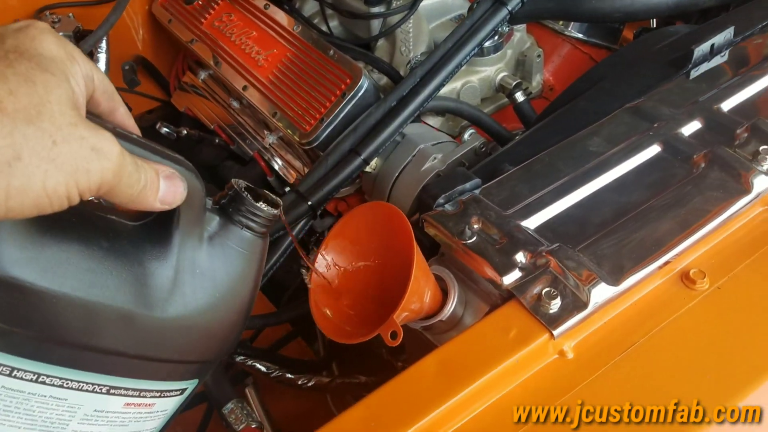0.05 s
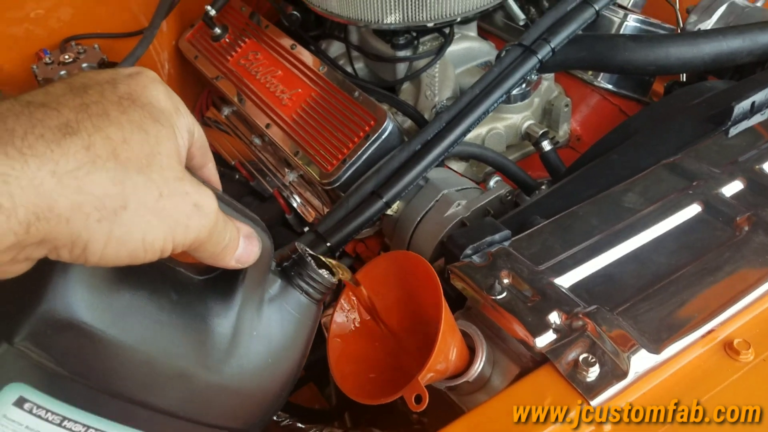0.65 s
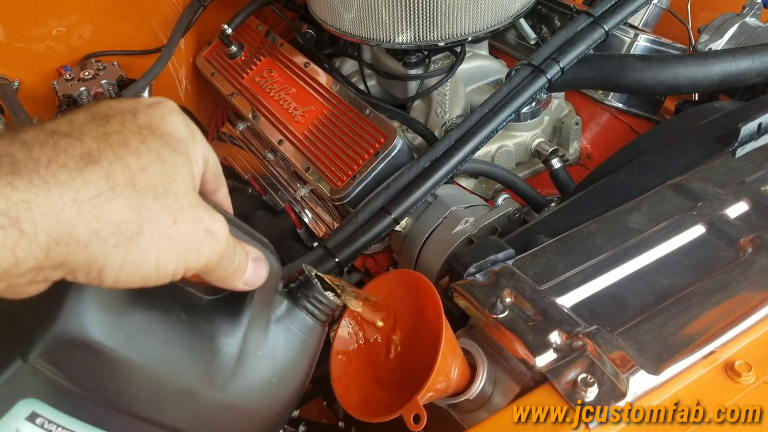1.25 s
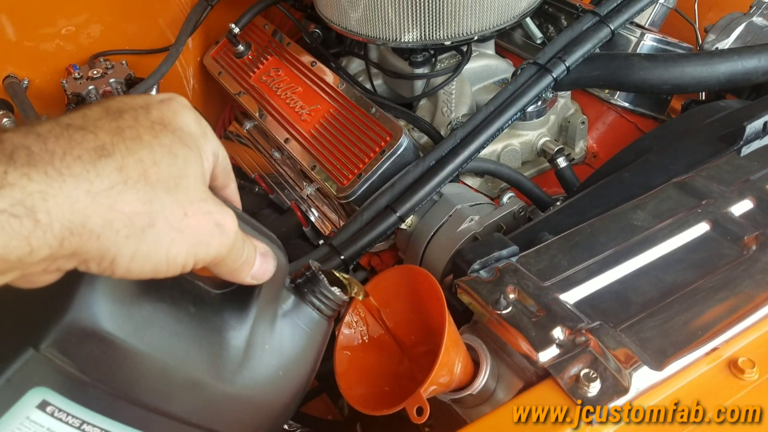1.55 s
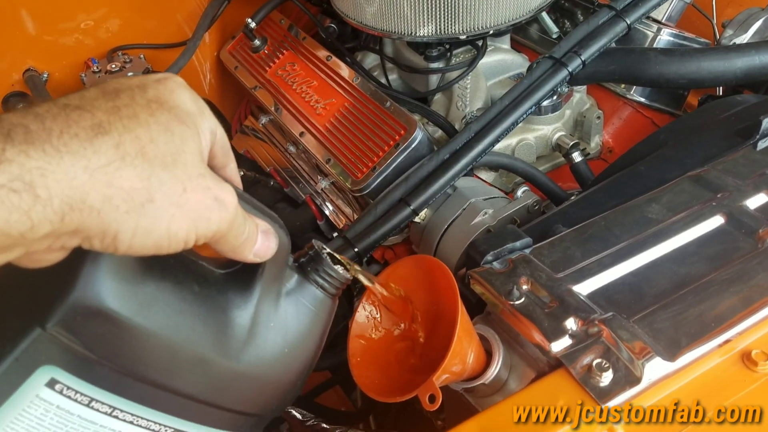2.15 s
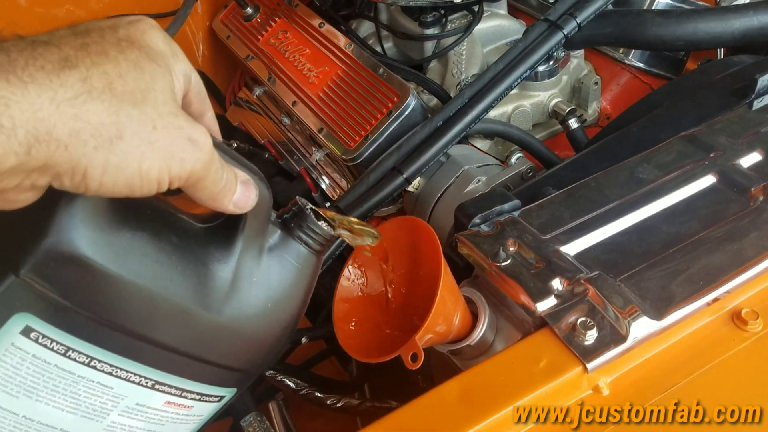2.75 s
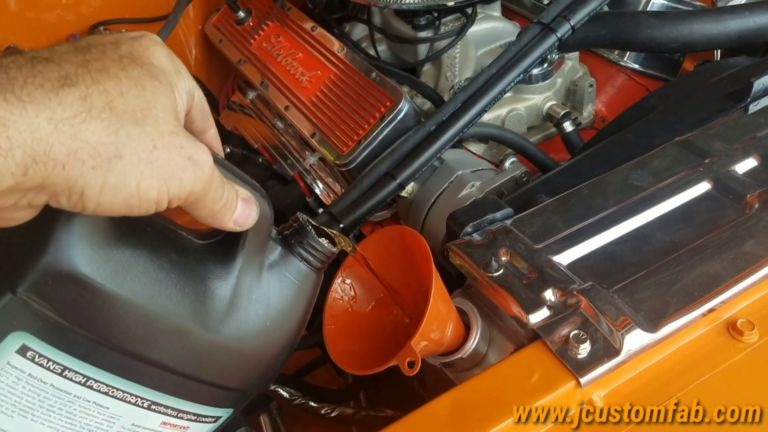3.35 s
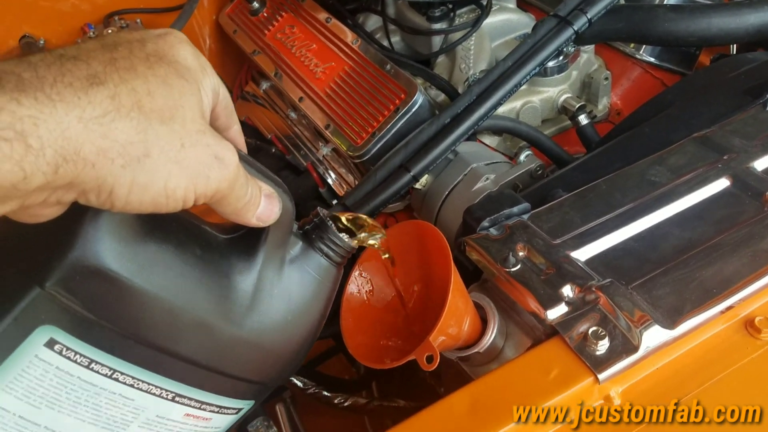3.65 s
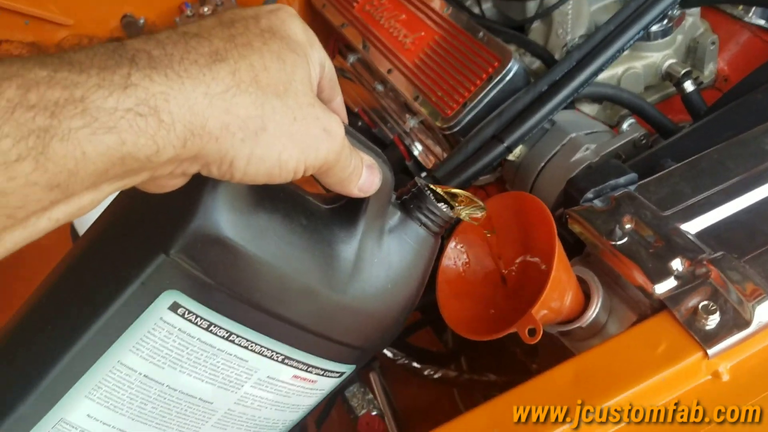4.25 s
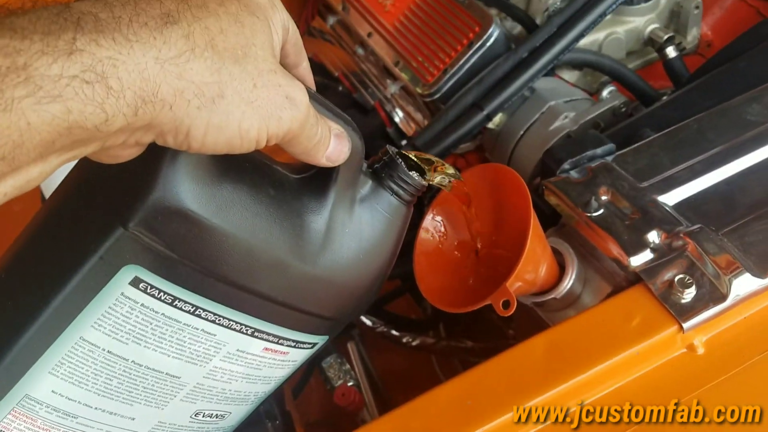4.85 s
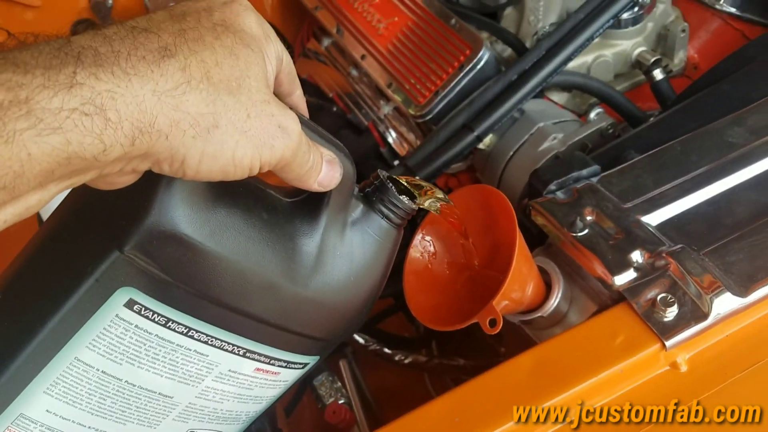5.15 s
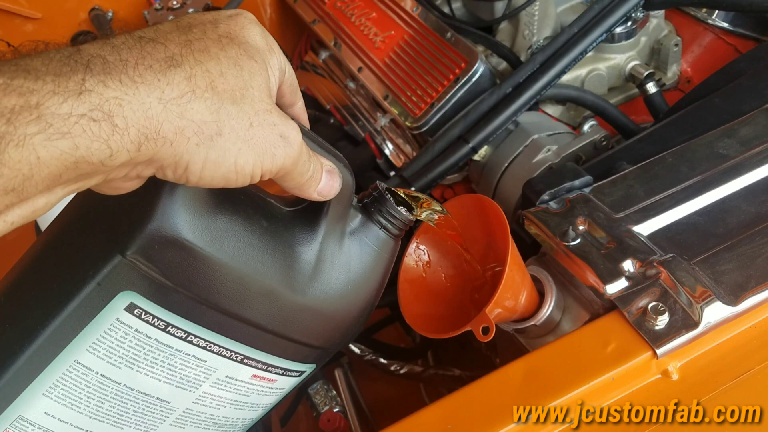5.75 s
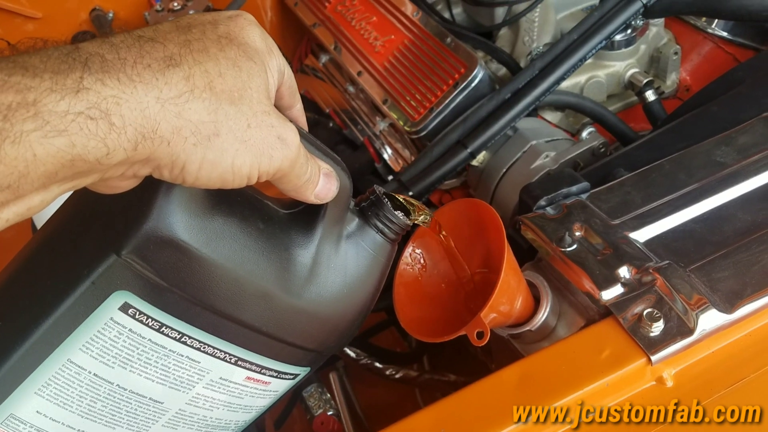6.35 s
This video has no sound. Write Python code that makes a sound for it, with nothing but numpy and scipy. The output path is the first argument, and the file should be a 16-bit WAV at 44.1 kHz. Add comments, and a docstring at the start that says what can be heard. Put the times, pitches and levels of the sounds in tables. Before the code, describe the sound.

Liquid pours from a plastic jug into a funnel, glugging and splashing softly, with a few knocks and rubs on the microphone.

```python
"""Coolant runs from a plastic jug into a funnel in a car's engine bay, inside a quiet garage.
The stream traps ringing bubbles and splashes on the funnel wall; two early knocks hit the camera case.
The jug glugs at a steady beat, air gulps up the filler neck and the liquid burbles into the radiator.
Past midway the hand-held camera is shifted: fingers knock and rub on it, close to the right microphone.
Toward the end the pour settles to an even stream."""
import sys
import numpy as np
from scipy import signal
from scipy.fft import rfft, irfft
from scipy.io import wavfile
from scipy.ndimage import uniform_filter1d, map_coordinates

SR = 44100
rng = np.random.default_rng(int(sys.argv[2]) if len(sys.argv) > 2 else 0)


def unload_wav(signal):
    """Save mono or channel-first audio to the path in sys.argv[1] as 16-bit WAV at rate SR, clipped to [-1, 1]."""
    wavfile.write(
        sys.argv[1],
        SR,
        np.round(np.clip(np.atleast_2d(signal).T, -1, 1) * 32767).astype(np.int16),
    )


N = 282151
TIME = np.arange(N) / SR
TOP_HZ = 15500
RING_HZ = 2310  # a typical bubble
IMPACT_FALL_S = 0.00068  # 1/e decay of a drop's first contact
# spectrum of spraying liquid: f/Hz, level/dB
SPRAY = [(220, -26), (600, -6.5), (1400, -1.5), (3000, -3), (6500, -7), (9000, -15.5), (12000, -8),
         (16000, -17)]


def plinks():
    """Minnaert resonance: a drop smacks the pool and traps a large bubble, ringing among smaller ones."""
    # large bubbles in the funnel: t/s, f/Hz, level/dB
    bubbles = [(0.3815, 2510, -35.5), (0.434, 1336, -30.5), (0.536, 1960, -33.5), (0.6576, 2000, -30),
               (0.6709, 1240, -31), (0.682, 5860, -30.5), (0.696, 1910, -29), (0.716, 1850, -36),
               (0.789, 2610, -28.5), (0.8136, 1670, -35), (0.8388, 1740, -33), (0.93, 1930, -26),
               (1.107, 1240, -35.5), (1.12, 3010, -30.5), (1.136, 1630, -37), (1.322, 1930, -29.5),
               (1.3392, 1610, -26.5), (1.3853, 1265, -34), (1.427, 1270, -38), (1.6146, 2510, -25),
               (1.7633, 1920, -26), (1.8045, 1445, -29.5), (1.816, 1910, -38), (1.977, 2540, -34.5),
               (2.14, 1370, -27), (2.198, 2050, -30), (2.2044, 2520, -29), (2.244, 2430, -32.5),
               (2.5264, 2180, -34), (2.6935, 2160, -31.5), (2.891, 7060, -39), (3.0324, 1600, -36.5),
               (3.088, 2720, -24), (3.1741, 2490, -27), (3.38, 5250, -31.5), (3.44, 2900, -27),
               (3.452, 5050, -37.5), (3.637, 1740, -28), (3.6804, 2235, -26.5), (3.763, 2600, -30.5),
               (3.824, 2170, -30), (4.004, 2260, -24.5), (4.1893, 1760, -30.5), (4.241, 1660, -30.5),
               (4.4154, 1250, -35), (4.437, 1710, -28.5), (4.472, 1640, -29.5), (4.6247, 1670, -22),
               (4.866, 1530, -39), (4.9158, 2270, -33.5), (4.963, 4600, -44.5), (4.9799, 1900, -33),
               (5.0273, 1250, -36.5), (5.118, 3180, -41), (5.154, 4600, -49), (5.202, 2160, -41),
               (5.293, 1660, -33.5), (5.4324, 2500, -42), (5.5647, 2075, -25), (5.593, 3550, -36),
               (5.627, 3200, -38), (5.7391, 1310, -32.5), (5.852, 5120, -30.5), (5.951, 1820, -30.5),
               (6.0256, 2500, -37.5), (6.0884, 2360, -38), (6.223, 1930, -34.5), (6.2547, 1150, -35.5),
               (6.265, 4440, -36), (6.2965, 3320, -32.5)]
    large, churn, pieces, impacts = np.zeros((2, N)), np.zeros(N), np.zeros(N), np.zeros(N)
    lead_s, clutch_s, clutch_octaves = 0.003, 0.05, 0.97  # the small bubbles' head start and spread
    t = TIME[:SR // 4]
    wake = (1 - np.exp(-t / 0.0018)) * np.exp(-t / 0.009)  # the pool churns for a moment
    for (s, hz, db), bend in zip(bubbles, rng.standard_normal(len(bubbles))):
        # the swirl lifts or sinks each bubble and bends its pitch
        plink = undb(db) * ring(hz, bubble_cycles(hz), rise=0.012 + 0.02 * bend)
        add(large, s, plink)  # straight to the microphones, then by way of the walls
        add(large, s, undb(-1.5) * scatter(plink))
        add(churn, s, undb(db) * wake)
        add(impacts, s, undb(db - 13.5) * np.exp(-t / IMPACT_FALL_S))
        for late, pitch in rng.random(size=(6, 2)):
            piece_hz = np.sqrt(hz * RING_HZ) * 2 ** (clutch_octaves * (pitch - .5))
            piece = ring(piece_hz, bubble_cycles(piece_hz), rise=0.07)
            add(pieces, s - lead_s + clutch_s * late, undb(db - 16.5 - 8 * late) * piece)
    foam = swarm(rate=900, centre_hz=2143, octaves=1.0, cycles=4.2, spread_db=4.5)
    smacks = impacts * unit(band(rng.standard_normal((2, N)), 1300, 4670))
    return large + smacks + pieces + scatter(pieces)[:, :N] + churn * undb(-11.5) * foam


def bubble_cycles(hz):
    """Damping: cycles to fall by 1/e, fewer for larger bubbles pitched below RING_HZ."""
    return 5.57 * min(hz / RING_HZ, 1) ** 0.48


def glugging():
    """Relaxation oscillation: the stream's level in dB surges each time the jug takes a gulp of air."""
    # the pour: t/s, level/dB, swing with each glug/dB
    pour = [(0.3, -61.5, -1.5), (0.65, -53.5, 5), (1.4, -51.5, 3), (2.3, -53, 5.5), (3.6, -53, -3.5),
            (6.3, -55, 0.5)]
    period_s, crest_s = 0.216, 1.365
    level_db, swing_db = curves(pour)
    return level_db + swing_db * np.cos(2 * np.pi * (TIME - crest_s) / period_s)


def trickle(flow_db):
    """Air entrainment: the stream folds in middling bubbles, with tiny drips and a wavering fizz."""
    drips = undb(-16) * swarm(rate=16, centre_hz=3500, octaves=0.8, cycles=4.5, spread_db=2.5)
    middling = undb(-3.5) * swarm(rate=75, centre_hz=1867, octaves=0.7, cycles=2.4, spread_db=2.4)
    strays = drips + middling
    fizz = undb(3 * walk(rate=19) - 12.5) * colour(crackle(rate=350, spread_db=4.5), SPRAY)
    return undb(flow_db) * (fizz + (strays + scatter(strays)[:, :N]) / np.sqrt(2))


def splashes():
    """Impact noise: liquid slaps the funnel wall, then its sheet tears into ragged spits."""
    # splashes on the wall: t/s, level/dB, 1/e decay/s
    hits = [(0.073, -45.5, 0.011), (0.2523, -47, 0.0075), (0.374, -46, 0.017), (0.6497, -44.5, 0.034),
            (0.751, -46, 0.005), (1.134, -39.5, 0.01), (1.3329, -40, 0.011), (1.382, -46.5, 0.013),
            (1.5554, -37.5, 0.0053), (1.636, -44.5, 0.017), (1.755, -41, 0.024), (2.243, -41, 0.014),
            (2.29, -37.5, 0.0045), (2.451, -37.5, 0.0072), (2.7512, -41.5, 0.0032), (3.0741, -34, 0.0082),
            (3.344, -48, 0.0022), (3.3806, -37.5, 0.0027), (4.196, -33, 0.0015), (5.006, -45, 0.0054),
            (5.086, -47, 0.005), (5.668, -44, 0.0049), (5.78, -44.5, 0.004), (6.023, -44, 0.0062),
            (6.2945, -41.5, 0.004)]
    force = np.zeros(N)
    t = TIME[:SR // 2]
    slap = undb(-8) * np.exp(-t / IMPACT_FALL_S)
    for s, db, fall_s in hits:
        add(force, s, undb(db) * (np.exp(-t / fall_s) + slap))
    spits = unit(undb(2 * walk(rate=300)) * crackle(rate=4000, spread_db=2.5))
    return colour(force * spits, SPRAY)


def squirts():
    """Narrow-band flow noise: air slips past the jug's lip, gliding in pitch as the gap changes."""
    # thin squirts: start t/s, end t/s, first f/Hz, last f/Hz
    glides = [(0.575, 0.676, 3290, 3540), (1.244, 1.28, 4200, 3400), (1.594, 1.767, 4300, 2810)]
    tones = np.zeros(N)
    for start, end, first_hz, last_hz in glides:
        hz = np.linspace(first_hz, last_hz, int((end - start) * SR))
        add(tones, start, np.sqrt(np.hanning(len(hz))) * np.sin(2 * np.pi * np.cumsum(hz) / SR))
    return undb(-55.0) * tones * walk(rate=1000)


def funnel(x):
    """Cavity resonance: the air in the funnel rings along with whatever happens in it."""
    # modes of the cone and spout: f/Hz, level/dB, cycles to fall by 1/e
    modes = [(1211, 4.5, 9.9), (1650, -2, 7.6), (2552, -2, 9.2)]
    response = np.zeros(N)
    for hz, db, cycles in modes:
        add(response, 0, undb(db) * 2 * hz / (cycles * SR) * ring(hz, cycles))
    return signal.oaconvolve(x, response[None, :SR // 10], axes=1)[:, :N]


def knocks():
    """Impact excitation: a finger draws a sharp tick and a short, hollow ring from the camera case."""
    # knocks: t/s, level/dB, tick f/Hz, hollow ring level/dB against the tick
    taps = [(0.463, -13, 2060, -28), (0.491, -17, 1600, -20), (3.4203, -20.5, 1130, -17),
            (3.7739, -5.5, 1030, -28), (3.7765, -1.5, 1790, -16), (3.836, -5.5, 1370, -32),
            (3.891, -8.5, 1970, -17.5), (3.9483, 3, 1740, -30), (3.9521, -7.5, 1380, -8.5),
            (4.013, -15, 3000, -18), (4.072, -12, 1008, -14), (4.1178, 2.5, 1220, -16.5),
            (4.2651, -7.5, 1270, -16.5), (4.295, -17, 900, -7.5), (4.5215, -14, 900, -3.5),
            (4.527, -10.5, 1430, -15.5), (4.5585, -11, 1120, -15.5)]
    # modes of the case: f/Hz, level/dB, cycles to fall by 1/e
    modes = [(385, -4.5, 1.5), (575, 2.5, 1.34), (1490, -9, 4.1)]
    ticks, hollow = np.zeros((2, N))
    for (s, db, hz, hollow_db), grip in zip(taps, rng.random(len(taps))):
        add(ticks, s, undb(db) * ring(hz, cycles=0.52))
        detune = 2 ** (0.41 * (grip - .5))  # the grip shifts the modes from knock to knock
        for mode_hz, mode_db, cycles in modes:
            add(hollow, s, undb(db + hollow_db + mode_db) * ring(mode_hz * detune, cycles))
    near = signal.sosfilt(signal.butter(1, 600, "high", fs=SR, output="sos"), ticks) + hollow
    near = signal.sosfilt(signal.butter(3, 310, "high", fs=SR, output="sos"), near)
    near *= 1 + undb(-14) * rng.standard_normal(N)  # the skin scratches as it lands
    far = undb(-10) * np.roll(band(near, 380, 1210), int(0.00036 * SR))  # late and dull on the left
    return np.array([far, near]) + undb(-14.0) * scatter(near)[:, :N] * pan(4.9)


def rubbing():
    """Stick-slip friction: skin jerks over the case, with a grainy body and a dry hiss."""
    # finger strokes: t/s, length/s, body level/dB, hiss level/dB, swell/s, 1/e decay/s
    strokes = [(3.88, 0.18, -39.5, -50.5, 0.036, 0.013), (4.053, 0.058, -33, -44, 0.027, 0.0085),
               (4.243, 0.094, -35.5, -38, 0.023, 0.015), (4.427, 0.052, -39, -45, 0.043, 0.01),
               (4.503, 0.11, -38.5, -39.5, 0.062, 0.015), (4.636, 0.085, -39.5, -53.5, 0.019, 0.015),
               (4.736, 0.018, -41, -52, 0.004, 0.049)]
    # spectra of the case's body and the skin's hiss: f/Hz, level/dB
    body_spectrum = [(140, -14), (250, -1.5), (380, 5), (1600, 1.5), (2500, 0.5), (3300, -12), (5500, -10),
                     (9000, -51)]
    hiss_spectrum = [(4000, 1.5), (8500, -5.5), (12000, 0), (16000, -7)]
    grip, slide = np.zeros(N), np.zeros(N)
    for s, length_s, body_db, hiss_db, swell_s, fall_s in strokes:
        swell = np.clip((TIME - s) / swell_s, 0, 1)
        stroke = swell * np.exp(-np.maximum(TIME - s - length_s, 0) / fall_s)
        grip += undb(body_db) * stroke
        slide += undb(hiss_db) * stroke
    body = grip * colour(crackle(rate=3500, spread_db=2.5), body_spectrum)
    hiss = slide * colour(rng.standard_normal((2, N)), hiss_spectrum)
    pressure = undb(2 * walk(rate=70))  # the fingers press unevenly
    return pressure * (body * [[undb(-11.0)], [1]] + hiss * [[undb(-8.0)], [1]])


def radiator():
    """Resonance of large bubbles: a deep burble in the tank, with gulps and a wash in the filler neck."""
    # burble in the tank: t/s, level/dB
    burble_levels = [(0.5, -74), (1.0, -58), (1.55, -62.5), (1.85, -50), (2.4, -59), (3.1, -67.5),
                     (4.9, -62.5), (5.4, -58)]
    # air gulping up the neck: t/s, level/dB
    gulp_levels = [(1.04, -45), (1.362, -42), (1.756, -38), (1.944, -41)]
    burble_db, = curves(burble_levels)
    deep = [swarm(rate=140, centre_hz=106.3, octaves=1.51, cycles=1.5, spread_db=3) for _ in range(2)]
    octaves_per_s = 0.12  # the burble is read ever faster, so it climbs as the tank fills
    filling = np.cumsum(2 ** (octaves_per_s * TIME))
    burble = np.array([map_coordinates(side, [filling], order=1, mode="wrap") for side in deep])
    wash = unit(band(crackle(rate=900, spread_db=4.5), 372, 692))
    gulps = np.zeros(N)
    for s, db in gulp_levels:
        add(gulps, s, undb(db) * ring(hz=116, cycles=0.76, rise=0.09))
    return undb(burble_db) * burble + gulps + undb(-60.5) * wash


def scatter(sound):
    """Early reflection: nearby surfaces return equal energy by random paths to each microphone."""
    t = TIME[:SR // 20]
    paths = rng.standard_normal((2, len(t))) * np.exp(-t / 0.0051) * (t > .0015)
    bounced = signal.fftconvolve(sound[None], paths)
    return bounced * np.linalg.norm(sound) / np.linalg.norm(bounced, axis=1, keepdims=True)


def echoes(x, t60, delay, top_hz):
    """Reverberation: dense reflections decay exponentially, differently at each microphone."""
    t = np.arange(int(t60 * SR)) / SR
    decay = np.exp(-np.log(1000) * t / t60) * (t > delay)
    response = band(rng.standard_normal((len(t), 2)).T, 66, top_hz) * decay
    response *= np.sqrt(2 * top_hz / SR) / np.linalg.norm(response, axis=1, keepdims=True)
    return signal.fftconvolve(x, response, axes=1)[:, :N]


def garage():
    """Ambient noise: a low, steady hush, uncorrelated between the microphones."""
    # spectrum of the quiet garage: f/Hz, level/dB
    spectrum = [(20, -24), (110, -10.5), (200, -2.5), (550, -5.5), (1400, -9.5), (2500, -14), (5000, -29.5),
                (9000, -34.5), (13000, -26)]
    return undb(-57) * colour(rng.standard_normal((2, N)), spectrum)


def ring(hz, cycles, rise=0):
    """Damped oscillation: it falls by 1/e in `cycles` while its pitch climbs by the share `rise`."""
    turns = np.arange(int(2 * np.pi * cycles / hz * SR)) * hz / SR
    age = turns / cycles
    swell = 1 - np.exp(-turns / (0.09 * np.sqrt(cycles)))
    return swell * np.exp(-age) * np.sin(2 * np.pi * turns * (1 + rise * age / 2))


def swarm(rate, centre_hz, octaves, cycles, spread_db):
    """Superposition: `rate` bubbles a second ring at random, their pitches scattered about a centre."""
    out = np.zeros(N)
    for when, size, shape, strength in rng.random((int(rate * N / SR), 4)):
        hz = min(centre_hz * 2 ** (octaves * (size - shape)), TOP_HZ)
        gain = undb(-spread_db * np.log(strength + .02))
        add(out, when * N / SR, gain * ring(hz, cycles, rise=.02))
    return unit(out)


def crackle(rate, spread_db):
    """Shot noise: tiny random impacts, a few much larger, different at each microphone."""
    shape = (2, N)
    sizes = undb(spread_db * np.minimum(rng.exponential(size=shape), 5))
    return unit((rng.random(shape) < rate / SR) * sizes * rng.choice([-1, 1], shape))


def walk(rate):
    """Random modulation: a smooth wander of rms 1, with `rate` new values a second."""
    k = int(SR / rate)
    return unit(uniform_filter1d(np.repeat(rng.standard_normal(N // k + 1), k), k)[:N])


def colour(x, points):
    """Minimum-phase filtering to a given spectrum, with unit power gain."""
    size = 1024
    hz, db = np.transpose(points)
    bin_hz = np.arange(size // 2 + 1) * SR / size
    log_gain = np.interp(np.log(bin_hz + 1), np.log(hz), np.log(undb(db)))
    causal_fold = np.r_[1, np.full(size // 2 - 1, 2), np.zeros(size // 2)]
    response = irfft(np.exp(rfft(irfft(log_gain) * causal_fold)))
    return signal.oaconvolve(np.atleast_2d(x), response[None] / np.linalg.norm(response), axes=1)[:, :N]


def band(x, low_hz, high_hz):
    """Gentle band-pass filtering."""
    edges_hz = [low_hz, min(high_hz, SR / 2 - 1)]
    return signal.sosfilt(signal.butter(2, edges_hz, "band", fs=SR, output="sos"), x)


def pan(right_db):
    """Level difference between the channels for a source on the right."""
    return undb(np.array([[-right_db], [right_db]]) / 2)


def curves(rows):
    """Linear interpolation of a table's columns in time."""
    s, *columns = np.transpose(rows)
    return [np.interp(TIME, s, c) for c in columns]


def add(track, s, sound):
    """Superpose a sound on a track from time s."""
    i = max(int(s * SR), 0)
    track[..., i:i + sound.shape[-1]] += sound[..., :max(N - i, 0)]


def undb(db):
    """Decibels to amplitude ratio."""
    return 10 ** (np.asarray(db) / 20)


def unit(x):
    """Normalise to rms 1."""
    return x / np.sqrt(np.mean(x ** 2))


def scene():
    """Superposition: the pour, a little to the right, with its echoes, radiator, handling and hush."""
    liquid = plinks() + trickle(glugging()) + splashes() + squirts()
    liquid = liquid + funnel(liquid)
    room = undb(-14) * echoes(liquid, t60=.35, delay=.006, top_hz=14500)
    hush = garage()
    pour = (liquid + room) * pan(4.2)
    return pour + radiator() + knocks() + rubbing() + hush


def record(dry):
    """Band limiting: a steep low-pass cuts the treble above TOP_HZ."""
    return signal.sosfilt(signal.ellip(8, .2, 70, TOP_HZ, fs=SR, output="sos"), dry)


dry = scene()
out = record(dry)
unload_wav(out)
```